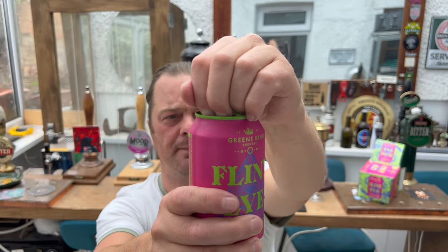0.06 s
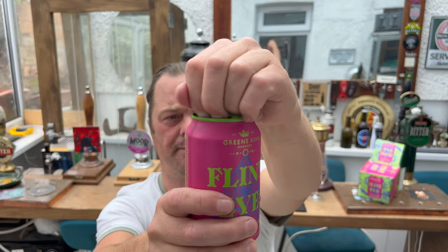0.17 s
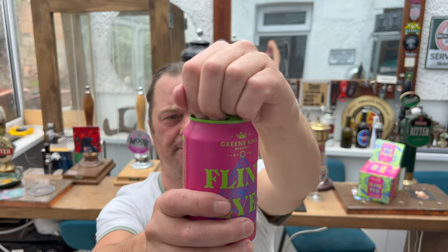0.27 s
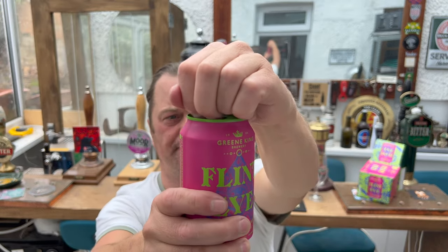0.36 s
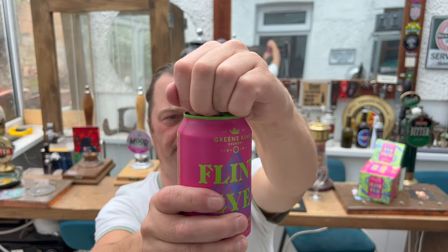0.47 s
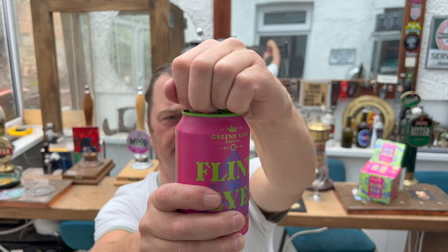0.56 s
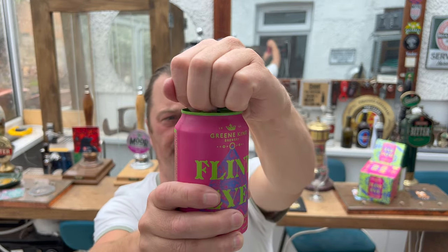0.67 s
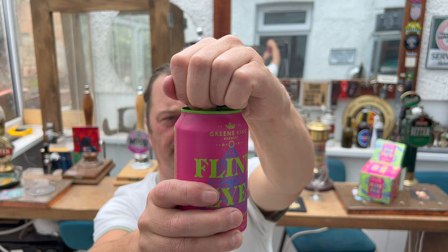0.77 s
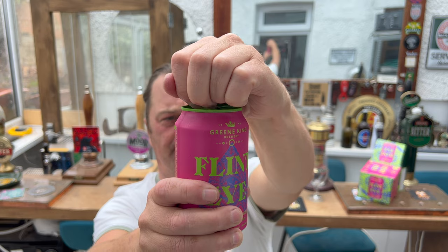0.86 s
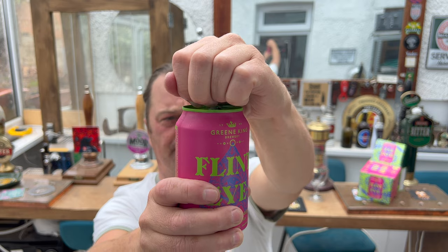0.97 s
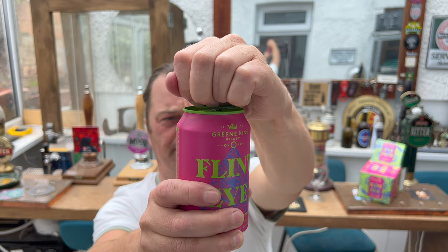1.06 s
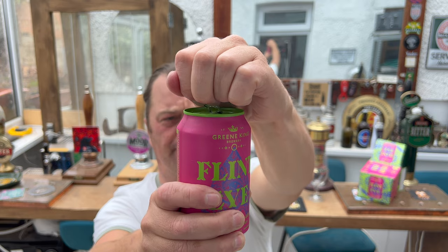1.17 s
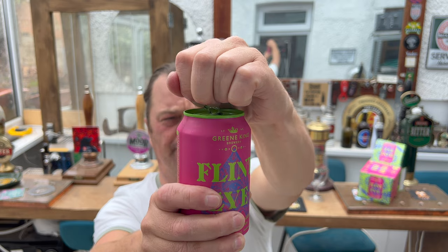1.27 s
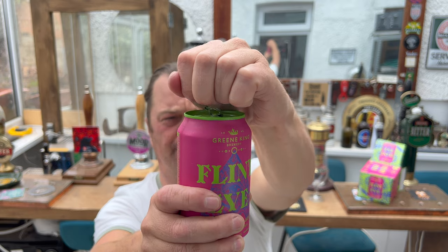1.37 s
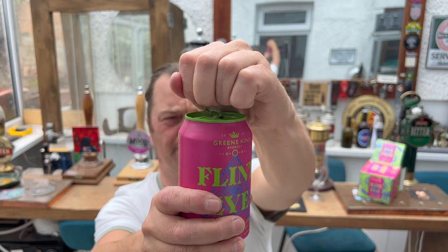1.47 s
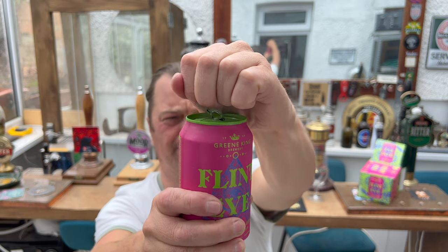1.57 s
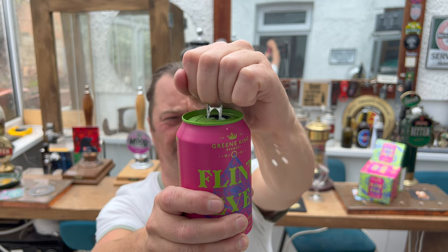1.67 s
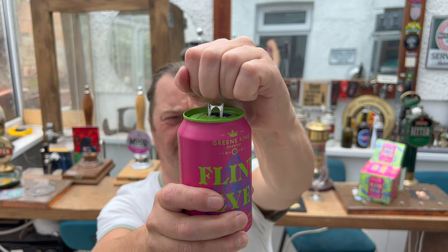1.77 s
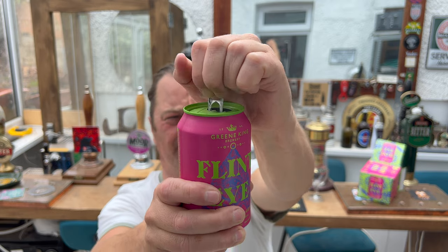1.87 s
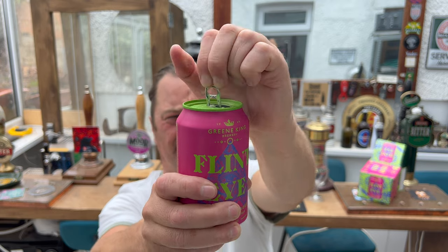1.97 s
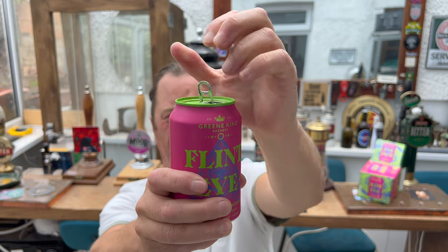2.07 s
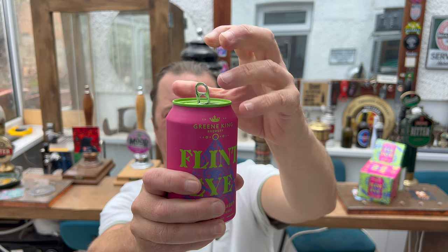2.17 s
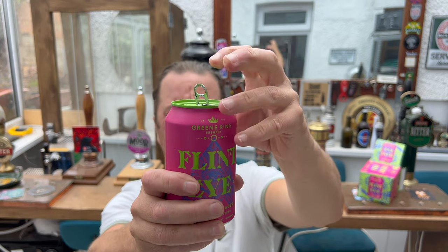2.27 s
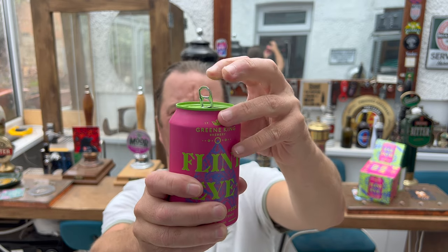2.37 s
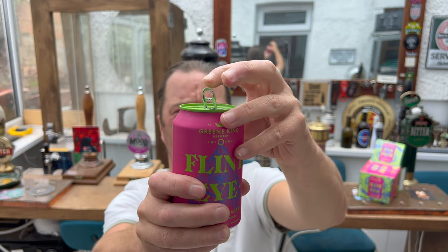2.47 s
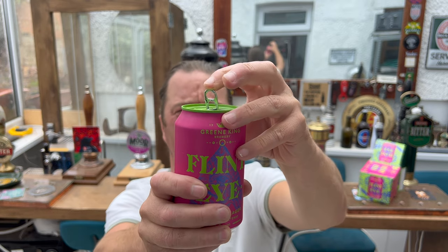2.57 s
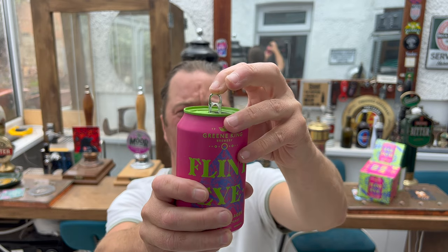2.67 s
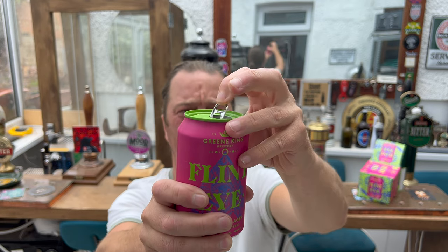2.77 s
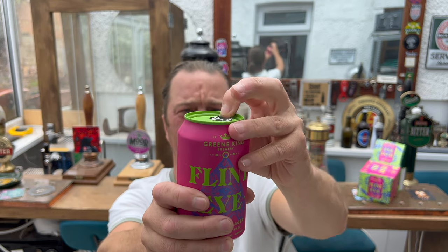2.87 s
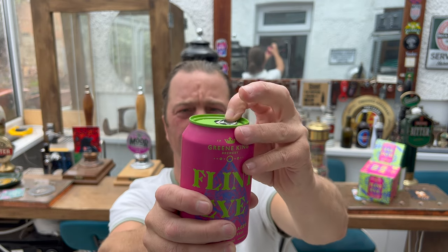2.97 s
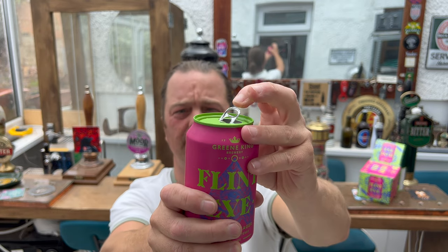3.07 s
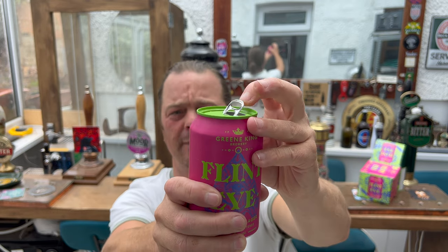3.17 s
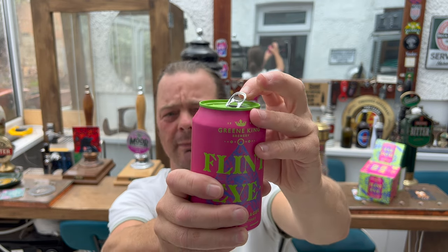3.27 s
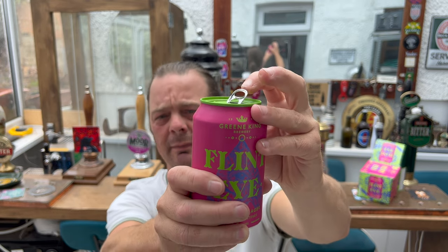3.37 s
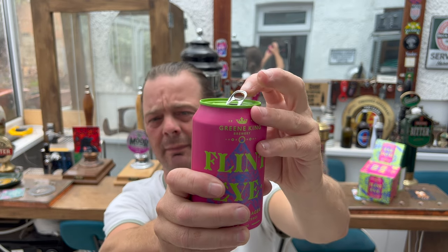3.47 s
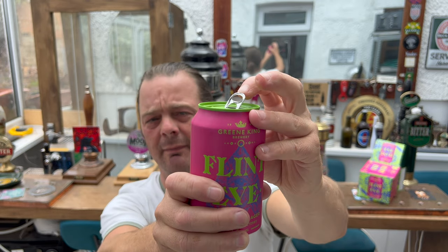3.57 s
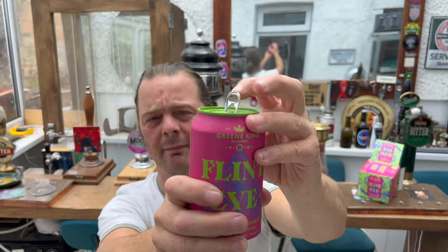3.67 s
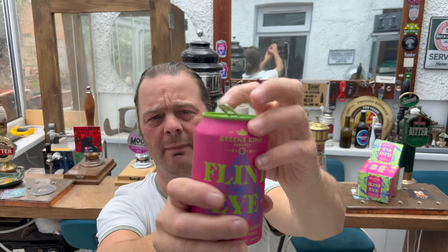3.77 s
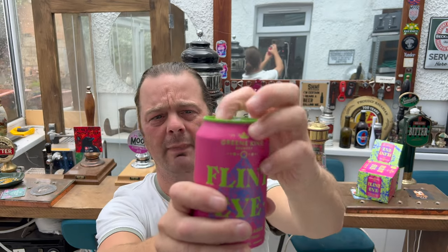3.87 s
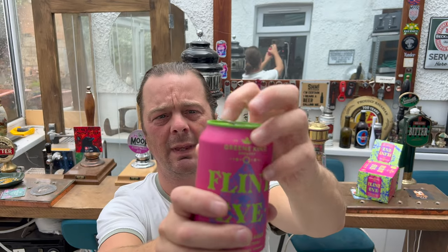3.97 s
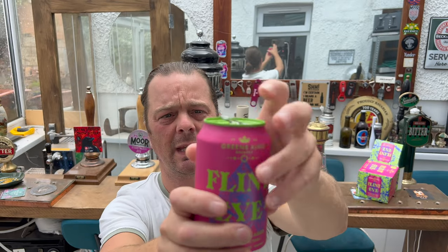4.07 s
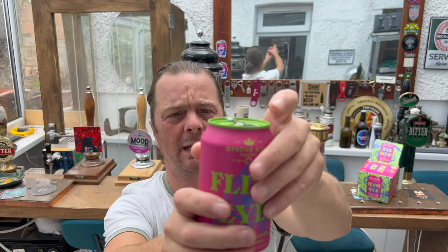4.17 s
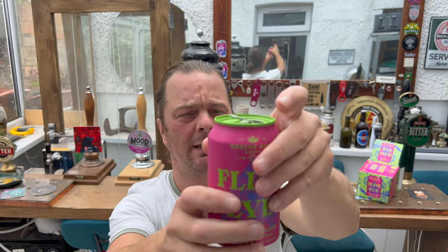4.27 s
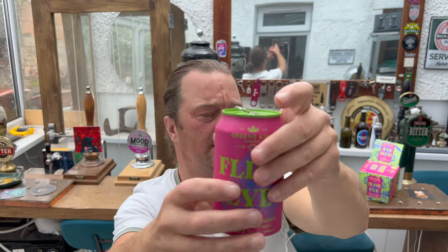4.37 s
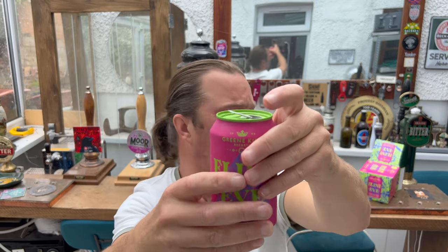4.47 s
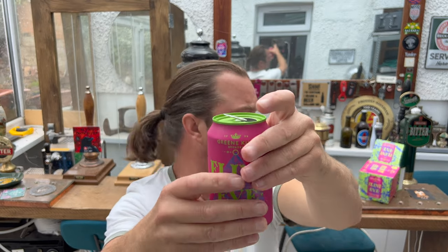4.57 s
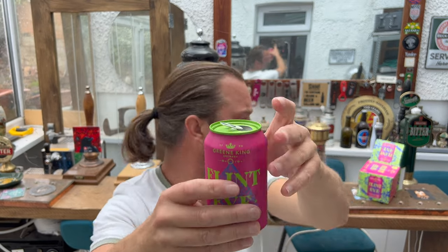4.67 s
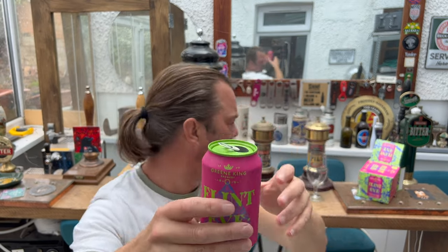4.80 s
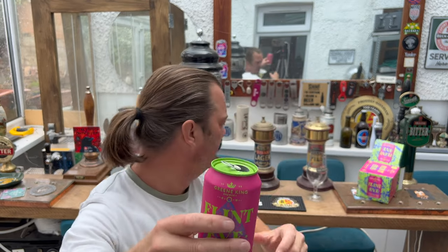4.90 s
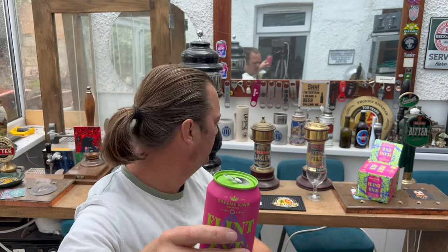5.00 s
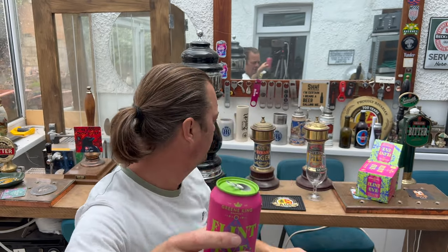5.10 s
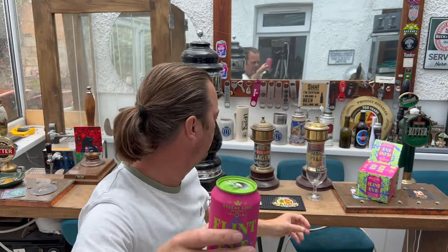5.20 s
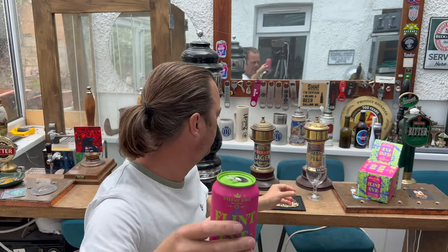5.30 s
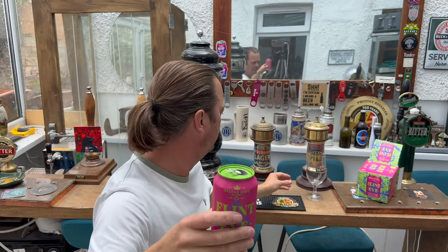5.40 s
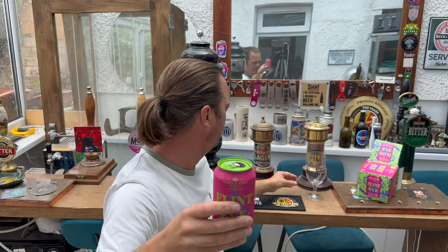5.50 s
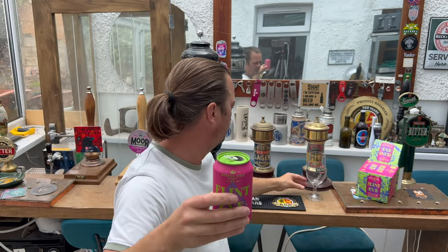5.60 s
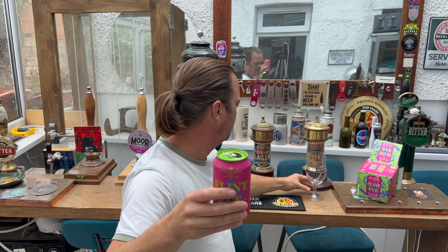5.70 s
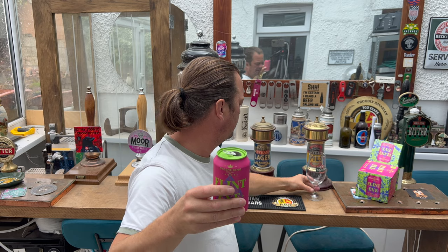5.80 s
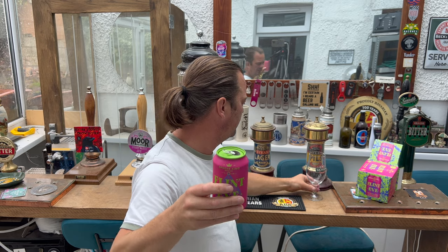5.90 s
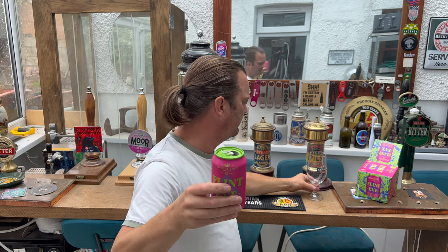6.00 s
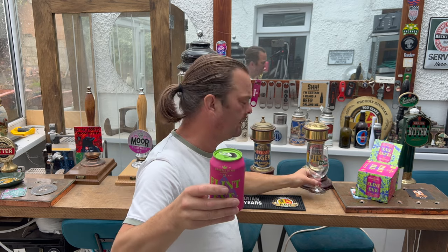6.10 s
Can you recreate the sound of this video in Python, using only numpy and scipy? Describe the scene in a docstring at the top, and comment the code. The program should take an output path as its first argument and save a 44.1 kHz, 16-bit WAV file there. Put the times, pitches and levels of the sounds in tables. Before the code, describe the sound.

Close to the microphone, the tab of a full aluminium can clicks, and a short hiss of gas ends in a loud, ringing pop. Half a second later the lid cracks open with a low thump and a brief fizz. Fingers then tap and scrape lightly at the tab. Faint cloth rustle and two soft thuds follow, over a low cooler hum in a small room.

```python
"""A cooler hums in a small hard-walled bar room; hands and cloth rustle. A full aluminium drinks can is
opened close to a phone. At 0.9 s the tab clicks; gas hisses through a slit, the lid pops, its echo dies
away. At 1.5 s the score line tears, the flap squeals and thumps, the drink fizzes. From 1.9 s fingers
fold the tab back with taps and scrapes; two soft thuds come late. The phone turns its gain down for a
moment after each loud burst."""
import sys
import numpy as np
from scipy import signal
from scipy.fft import rfft, irfft, next_fast_len
from scipy.io import wavfile
from scipy.ndimage import uniform_filter1d, map_coordinates

SR = 44100
rng = np.random.default_rng(int(sys.argv[2]) if len(sys.argv) > 2 else 0)


def generate_wav(signal):
    """Clip the signal to [-1, 1] and save it as 16-bit WAV at the path in sys.argv[1]."""
    frames = np.transpose(np.atleast_2d(signal))
    scaled = np.clip(frames, -1, 1) * 32767
    pcm = np.round(scaled).astype(np.int16)
    wavfile.write(sys.argv[1], SR, pcm)


N = 271038

# cooler and room noise: (time [s], hum [dB], rumble [dB], air [dB])
COOLER_LEVELS = [(0, -57, -65, -59.5), (.85, -58, -65, -60.5), (2.3, -58.5, -68, -60.5),
                 (2.7, -62.5, -77.5, -61), (3.12, -65, -87, -64), (3.19, -61, -74, -63.5),
                 (3.6, -59.5, -73, -63), (4.1, -58.5, -73, -60), (4.3, -57.5, -60, -60),
                 (4.5, -58.5, -71, -59), (4.7, -58.5, -61.5, -59.5), (5.1, -58.5, -65, -60.5),
                 (5.5, -56, -64.5, -59.5), (6.15, -59, -62, -60.5)]
# air noise: (frequency [Hz], density [dB])
AIR_COLOUR = [(60, -29), (90, -15), (134, -11), (162, -15), (185, -9.5), (215, -16.5), (283, -14),
              (340, -19), (390, -13.5), (555, -21), (700, -24), (950, -22), (1200, -29), (1550, -22),
              (2420, -44), (5120, -48), (8500, -47.5), (10000, -79.5), (22000, -120)]
# rumble: (frequency [Hz], density [dB])
RUMBLE_COLOUR = [(15, -31.5), (30, -18.5), (50, -4), (72, 2.5), (95, -21.5), (200, -58.5)]
# skin and cloth strokes: (peak time [s], level [dB], rise [s], hold [s])
RUSTLE_STROKES = [(.188, -72, 0.05, 0), (.478, -75, 0.041, 0), (.66, -78, 0.13, 0),
                  (0.792, -78.5, 0.027, 0.37), (1.933, -62, 0.082, 0.017), (2.202, -83, 0.095, 0.58),
                  (4.17, -71, 0.21, 0.39), (4.574, -71.5, 0.2, 0.35), (4.906, -73, .2, 0.29),
                  (5.334, -60, 0.062, 0.026), (5.628, -77, 0.064, 0.13), (5.89, -75.5, 0.068, 0.0053),
                  (6.107, -77.5, 0.066, 0.11)]
# skin and cloth friction: (frequency [Hz], density [dB])
RUSTLE_COLOUR = [(590, -41), (950, -3), (1150, -8.5), (1500, -2), (2400, -6.5), (3200, -9.5), (4200, -11.5),
                 (6180, -10), (9000, -20.5), (12300, -35), (16000, -41)]
# soft thuds in the room: (time [s], level [dB])
THUDS = [(4.552, -59), (5.389, -49)]
# thudding body: (frequency [Hz], level [dB], t60 [s])
THUD_MODES = [(181, 0, 0.29), (220, -1.5, 0.14)]
# room decay: (frequency [Hz], t60 [s])
ROOM_T60 = [(200, 0.14), (800, 0.25), (2100, 0.29), (5500, 0.22), (9000, .3), (11000, 0.12), (15000, 0.11)]
# wall reflections: (frequency [Hz], level [dB])
WALL_COLOUR = [(250, -24.5), (600, 3.5), (1100, 0.5), (1900, -2.5), (2400, -4), (3100, -0.5), (4400, -3.5),
               (5000, -0.5), (5700, -4.5), (7500, -10.5), (8500, -10.5), (10000, -4.5), (16000, -8)]
# the pop's ringing echo in the room: (frequency [Hz], density [dB])
POP_ECHO_COLOUR = [(600, -56), (1300, -19), (1900, 1), (2400, -16.5), (3100, -25), (3900, -3.5), (4350, -3),
                   (5050, -15), (5700, -2), (6100, -12), (6800, -24), (9500, -28.5), (11000, -42.5),
                   (16000, -55)]

# foam: (frequency [Hz], density [dB])
FOAM_COLOUR = [(300, -49.5), (650, -20), (850, -4), (985, -0.5), (1250, -6), (2000, 1), (2800, -3.5),
               (3840, 3), (5200, -4.5), (6900, -1), (9500, -14), (11500, -24), (16000, -41)]
# nail drags on the lid: (peak time [s], level [dB], rise [s], hold [s])
SCRATCHES = [(3.65, -67.5, 0.102, 0.021), (4.6, -65, .03, 0.045), (4.7, -69, 0.061, 0.024),
             (3.74, -76, .03, 0.029), (2.1, -76, .05, 0.043), (2.5, -83, .05, 0.055),
             (4.8, -74, 0.046, 0.034)]
# skin and nail on metal: (frequency [Hz], density [dB])
SCRAPE_COLOUR = [(700, -22.5), (1400, 2.5), (2100, -3.5), (3000, -10.5), (4300, -11.5), (6200, -6.5),
                 (8500, -12.5), (12000, -42), (16000, -36)]
# touches of the can; knock, lid and tab relative to level:
# (time [s], level [dB], wall pitch [Hz], knock [dB], lid [dB], tab [dB], tick [dB], scrape [dB])
TAPS = [(0.2955, -52.5, 1070, 1, -11, -38, -79, -92), (1.944, -42, 1367, -36, -14, -28, -47.5, -74),
        (1.959, -53.5, 1414, -1.5, -7, -21, -52, -77), (2.678, -47.5, 1430, -14, -30, -33.5, -54, -66.5),
        (2.698, -49.5, 1170, -14.5, -31, -12.5, -54, -71), (2.709, -43.5, 1145, -28, -35, -35, -45, -83),
        (2.793, -61, 1050, 5, -26, -32, -63, -89), (2.833, -53.5, 1496, -17, -32, -35, -50, -70.5),
        (3.032, -42.5, 1131, -13, -16, -6.5, -71.5, -68.5), (3.196, -46.5, 1370, -16, -15, -9, -74, -66.5),
        (3.315, -52, 1114, -19.5, -17, -33, -72, -69.5), (3.442, -42, 1100, -16, -22, -15, -74, -69.5),
        (3.791, -47, 1120, -18, -11, -13.5, -57, -67.5), (3.9088, -40, 1403, -15, -1, -7.5, -40, -59.5),
        (4.184, -50, 1410, -29.5, -20, -16, -53.5, -73.5), (4.23, -56.5, 1386, -19, -14, -1, -56, -83),
        (4.326, -52.5, 1330, -12, -11, -2, -51.5, -63), (4.345, -46, 1400, -21, -10.5, -3, -52, -64.5),
        (4.409, -51, 1460, -11.5, -12, -2, -68, -67.5)]
# whole filled can: (frequency [Hz], level [dB], t60 [s])
CAN_MODES = [(801, -0.5, 0.067), (905, 1, 0.055)]
# pull tab: (frequency [Hz], level [dB], t60 [s])
TAB_MODES = [(2620, -2, 0.011), (2790, 1, 0.014), (3700, -12, 0.014), (4740, -8, 0.014)]
# lid: (frequency [Hz], level [dB], undamped t60 [s])
LID_MODES = [(1850, -6, 0.07), (1950, 1, 0.09), (2040, 0, 0.09), (2150, -12, 0.03), (2470, -22, 0.006),
             (4140, -6, 0.02)]
# nail tick: (frequency [Hz], density [dB])
TICK_COLOUR = [(800, -9), (1500, -17), (2600, -15), (4000, -12), (5500, -1), (7000, 8), (9000, 0),
               (12000, -15), (17000, -21)]

# low swells after the thump: (start [s], length [s], level [dB], frequency [Hz])
AFTER_SWING = [(1.5278, 0.24, -33, 51), (1.761, 0.197, -33.5, 47.5), (1.97, 0.22, -51.5, 47.3)]
# score line tearing: (time [s], level [dB])
TEAR_LEVELS = [(1.524, -91), (1.528, -37.5), (1.532, -27), (1.538, -24.5), (1.556, -23), (1.561, -16),
               (1.565, -13), (1.569, -21), (1.572, -63)]
# tearing noise: (frequency [Hz], density [dB])
TEAR_COLOUR = [(300, -17), (700, -11), (1100, -7.5), (1500, -9.5), (2000, 2), (2400, -4.5), (2800, -8),
               (4000, -3), (5200, -9.5), (6200, -3), (8200, -5.5), (9500, -12), (12000, -22.5),
               (16000, -17)]
# bending flap: (time [s], level [dB], pitch [Hz])
FLAP_SQUEAL = [(1.535, -79, 4314), (1.538, -20.5, 4600), (1.543, -22.5, 5037), (1.553, -17, 5193),
               (1.556, -33, 5450), (1.561, -24, 5600), (1.564, -80.5, 5566)]
# gas through the widening slit: (time [s], level [dB], lid share [dB], roar share [dB])
JET_LEVELS = [(1.008, -57, -10, -20), (1.016, -50.5, -12.5, -20), (1.02, -29.5, -14.5, -20.5),
              (1.035, -21, -11, -12), (1.05, -21, -18, -11.5), (1.066, -18.5, -8, -6),
              (1.075, -20, 0.5, -2.5), (1.088, -21.5, -4, -3), (1.097, -19, -2, 6.5), (1.101, -57, -17, 2)]
# narrow-slit hiss: (frequency [Hz], density [dB])
JET_COLOUR = [(950, -30), (1500, -15), (2020, -9.5), (3600, -17.5), (5500, -5.5), (7300, 8), (8500, 5.5),
              (10200, -4), (12300, 2.5), (13300, -11.5), (15200, 3.5), (16000, -1)]
# wide-slit roar: (frequency [Hz], density [dB])
ROAR_COLOUR = [(180, -35), (320, -13.5), (900, -11.5), (1400, 2), (1700, -5), (2600, -11.5), (3400, -20),
               (4300, -5), (6200, 1), (8000, -9), (16000, -31)]
# lid snaps: (time [s], ring [dB], crack [dB], top crack [dB])
SNAPS = [(0.8978, -28.5, -12.5, -19), (1.0086, -37.5, -28.5, -34.5), (1.018, -41, -32, -24),
         (1.0686, -3.5, -11.5, -30.5), (1.0914, -5.5, -19.5, -40), (1.0957, -5, -7, -20),
         (1.5249, -36.5, -36, -34.5), (1.5325, -17.5, -26.5, -11), (1.535, -15, -7.5, -11),
         (1.557, -42, -23, -15.5), (1.5624, -44.5, -12.5, -16.5), (1.5637, -15, -8, -10)]
# metal crack: (frequency [Hz], density [dB])
CRACK_COLOUR = [(1500, -35.5), (2500, -10.5), (3300, -14), (3900, -14), (4350, -0.5), (4800, -4),
                (5250, 0.5), (5800, -9.5), (6500, -5.5), (7200, -1.5), (9000, -4), (10500, -21.5),
                (17000, -25.5)]
# top of the crack: (frequency [Hz], density [dB])
TOP_CRACK_COLOUR = [(6000, -31), (8200, -2.5), (10000, -7), (11800, 2.5), (13600, -17.5), (15200, -4),
                    (17000, -12)]

# diffuse sound at the two microphone ports: (frequency [Hz], coherence [ratio])
COHERENCE = [(60, 0.36), (130, 0.98), (290, 0.52), (640, 0.027), (1400, 0.31), (3100, 0.064),
             (15000, 0.0046)]
# diffuse balance: (frequency [Hz], left over right [dB])
AROUND_BALANCE = [(60, 1.5), (380, 5), (1300, 4), (2400, 4), (4400, 10.5), (8100, 13.5), (12000, -11)]
# direct balance: (frequency [Hz], left over right [dB])
CAN_BALANCE = [(60, 3.5), (500, 4.5), (1200, 1), (2000, 3.5), (4400, 5), (8100, 1), (12000, 0)]
# direct phase: (frequency [Hz], left lead [rad])
CAN_LEAD = [(0, -0.5), (1700, 0.68), (2700, 1.5), (4300, 2), (5600, 1), (8000, 2.5), (12000, 1.27),
            (16000, 1)]
# close noise that differs between ports: (frequency [Hz], share [dB])
NEAR_SPREAD = [(500, -8), (4500, -4), (9000, -7), (14000, -15.5)]

SIDES = np.array([[.5], [-.5]])  # left, right


def amp(db):
    """Decibels to gain."""
    return 10 ** (np.asarray(db) / 20)


def unit(x):
    """x at rms 1."""
    return x / np.sqrt(np.mean(x ** 2) + 1e-20)


def along(points, hz):
    """(frequency, value) points read on a log axis."""
    point_hz, values = np.transpose(points)
    return np.interp(np.log(hz + 1), np.log(point_hz + 1), values)


def curves(rows):
    """Per-sample curve of each column after the time."""
    times_s, *columns = np.transpose(rows)
    return [np.interp(np.arange(N) / SR, times_s, column) for column in columns]


def envelope(rows):
    """Gain of a (time, level) curve, silent outside its span."""
    times_s, db = np.transpose(rows)[:2]
    return amp(np.interp(np.arange(N) / SR, times_s, db, left=-300, right=-300))


def swell(peak_s, db, rise_s, hold_s, fall_db_per_s):
    """Gain that climbs 20 dB per rise time, holds, then falls."""
    t = np.arange(N, dtype=np.float32) / SR - peak_s
    rise_db = 20 * np.minimum(t, 0) / rise_s
    return amp(db + rise_db - fall_db_per_s * np.clip(t - hold_s, 0, None))


def wobble(rate_hz):
    """Smooth random curve with knots at rate_hz."""
    knots = rng.standard_normal(int(N * rate_hz / SR) + 4)
    return map_coordinates(knots, [np.arange(N) * rate_hz / SR])


def filtered(x, response):
    """x through a complex frequency response."""
    size = next_fast_len(N + SR // 2)
    return irfft(rfft(x, size) * response(np.fft.rfftfreq(size, 1 / SR)), size)[..., :N]


def diffuse_noise(colour):
    """Noise from all around: partly alike in the bass, unrelated in the treble."""
    def mid_side(hz):
        angle = np.arccos(np.clip(along(COHERENCE, hz), -1, 1)) / 2
        return amp(along(colour, hz)) * [np.cos(angle), np.sin(angle)]
    mid, side = filtered(rng.standard_normal((2, N)), mid_side)
    return unit(np.array([mid + side, mid - side]))


def near_noise(colour):
    """Noise from the can, not quite alike at both ports."""
    mid, side = unit(filtered(rng.standard_normal((2, N)), lambda hz: amp(along(colour, hz))))
    return mid + filtered(side, lambda hz: amp(along(NEAR_SPREAD, hz))) * 2 * SIDES


def patchy(x, depth_db):
    """x with random louder and softer time-frequency patches, rms 1."""
    spectra = signal.stft(x, nperseg=512)[2]
    field = rng.standard_normal(spectra.shape[1:])
    field = uniform_filter1d(uniform_filter1d(field, size=9, axis=0), size=9, axis=1)
    return unit(signal.istft(spectra * amp(depth_db * unit(field)), nperseg=512)[1][:, :N])


def burst(colour, t, t60_s):
    """Decaying puff of coloured noise."""
    gain = amp(along(colour, np.fft.rfftfreq(len(t), 1 / SR)))
    noise = irfft(rfft(rng.standard_normal(len(t))) * gain, len(t))
    return unit(noise) * amp(-60 * t / t60_s)


def ring(modes, t, scatter_db):
    """One blow on a set of modes, strengths scattered."""
    return sum(amp(db + scatter_db * rng.standard_normal() - 60 * t / t60_s) * np.sin(2 * np.pi * hz * t)
               for hz, db, t60_s in modes)


def finger_damping(t, free_s=.0038, residue=.13):
    """Gain of metal that rings freely until a finger damps it."""
    return residue + (1 - residue) * np.exp(-(t / free_s) ** 6)


def cooler(hum_hz=105.9):
    """Wavering hum over air noise and rumble."""
    hum_db, rumble_db, air_db = curves(COOLER_LEVELS)
    hum_gain = np.sqrt(2) * amp(hum_db + wobble(8.6))
    hum = hum_gain * np.sin(2 * np.pi * np.cumsum(hum_hz + .61 * wobble(6)) / SR)
    air = amp(air_db) * patchy(diffuse_noise(AIR_COLOUR), depth_db=1.5)
    rumble = amp(rumble_db + 2.2 * wobble(12)) * diffuse_noise(RUMBLE_COLOUR)
    return hum + air + rumble


def rustle():
    """Skin and cloth rub in uneven swells."""
    power = sum(swell(*stroke, fall_db_per_s=140) ** 2 for stroke in RUSTLE_STROKES)
    friction = patchy(diffuse_noise(RUSTLE_COLOUR), depth_db=2.5)
    return np.sqrt(power) * friction * amp(1.4 * wobble(120))


def thuds(attack_s=.004):
    """A padded contact rings a low body."""
    out, t = np.zeros(N + SR), np.arange(SR // 5) / SR
    attack = 1 - np.exp(-t / attack_s)
    for start_s, db in THUDS:
        out[round(start_s * SR):][:len(t)] += amp(db) * ring(THUD_MODES, t, scatter_db=1.5) * attack
    return out[:N]


def room(x, gap_s=.011, rise_s=.004):
    """Walls reflect after a gap; decay depends on frequency."""
    hz, t, spectra = signal.stft(rng.standard_normal((2, SR)), SR, nperseg=256)
    tail_db = along(WALL_COLOUR, hz)[:, None] - 60 * t / along(ROOM_T60, hz)[:, None]
    tail = signal.istft(spectra * amp(tail_db), SR, nperseg=256)[1]
    onset = np.clip((np.arange(tail.shape[1]) / SR - gap_s) / rise_s, 0, 1)
    return signal.fftconvolve(x[None], tail * onset / np.linalg.norm(tail[0]), axes=1)[:, :N]


def pop_echo():
    """The pop's ringing echo dies away in the room."""
    gain = swell(peak_s=1.108, db=-24, rise_s=.008, hold_s=0, fall_db_per_s=121.5)
    return gain * diffuse_noise(POP_ECHO_COLOUR)


def fizz():
    """The drink foams up once the can is open."""
    gain = swell(peak_s=1.579, db=-24.5, rise_s=.008, hold_s=0, fall_db_per_s=113.6)
    return gain * amp(.52 * wobble(310)) * diffuse_noise(FOAM_COLOUR)


def scrape(rise_s=.006, hold_s=.025):
    """Skin and nail drag in grains, alone and after each tap."""
    strokes = SCRATCHES + [(start_s, scrape_db, rise_s, hold_s) for start_s, *_, scrape_db in TAPS]
    power = sum(swell(*stroke, fall_db_per_s=174) ** 2 for stroke in strokes)
    return np.sqrt(power) * amp(2.1 * wobble(250)) * near_noise(SCRAPE_COLOUR)


def taps(attack_s=.0007, grip_spread=.025):
    """Each touch rings wall, lid, can and tab; the nail ticks. Grip detunes the tab."""
    out, t = np.zeros(N + SR), np.arange(SR // 10) / SR
    attack = 1 - np.exp(-t / attack_s)
    for start_s, db, wall_hz, knock_db, lid_db, tab_db, tick_db, _ in TAPS:
        wall_modes = [(.9 * wall_hz, -9, .03), (wall_hz, -5, .03), (1.15 * wall_hz, -10, .02)]
        wall = ring(wall_modes, t, scatter_db=2)
        lid = amp(lid_db) * ring(LID_MODES, t, scatter_db=2) * np.sqrt(finger_damping(t))
        knock = amp(knock_db) * ring(CAN_MODES, t, scatter_db=2)
        detune = 1 + grip_spread * rng.standard_normal()
        tab = amp(tab_db) * ring(TAB_MODES, t * detune, scatter_db=3)
        tick = amp(tick_db) * burst(TICK_COLOUR, t, t60_s=.025)
        out[round(start_s * SR):][:len(t)] += attack * (amp(db) * (wall + lid + knock + tab) + tick)
    return out[:N]


def thump(start_s=1.567, final_hz=58):
    """The flap gives way: cavity note drops as the can vents, one suction dip, low after-swing."""
    clock_s = np.arange(N) / SR
    t = clock_s - start_s
    vent_s = np.clip(t, -.004, None)
    cycles = final_hz * vent_s + 1.8 * (1 - np.exp(-vent_s / .0045)) - .3 * np.exp(-vent_s / .002)
    fade = np.exp(-np.abs(vent_s / .036) ** 5) * np.clip((t + .004) / .002, 0, 1)
    note = amp(-17.5) * np.cos(2 * np.pi * cycles) * fade
    suction = amp(-6) * np.exp(-((t - .014) / .0026) ** 2)
    swing = np.zeros(N)
    for onset_s, length_s, db, hz in AFTER_SWING:
        age_s = clock_s - onset_s
        arch = np.sin(np.pi * np.clip(age_s / length_s, 0, 1))
        swing += amp(db) * arch * np.cos(2 * np.pi * hz * age_s)
    return note - suction + swing * np.clip(t / .02, 0, 1)


def tear():
    """Metal parts in tiny uneven steps, gas rushes through, the bending flap squeals upward."""
    pitch_hz = curves(FLAP_SQUEAL)[1] + 90 * wobble(500)
    squeal = amp(3.5 * wobble(330)) * np.sin(2 * np.pi * np.cumsum(pitch_hz) / SR)
    rip = amp(1.9 * wobble(360)) * near_noise(TEAR_COLOUR)
    return envelope(TEAR_LEVELS) * rip + envelope(FLAP_SQUEAL) * squeal


def jet(mode_width_hz=150):
    """Gas seeps, leaks, then rushes through the slit; its fluttering turbulence shakes the lid."""
    def lid_response(hz):
        loss = 1j * hz * mode_width_hz
        return sum(amp(db) * loss / (mode_hz ** 2 - hz ** 2 + loss) for mode_hz, db, _ in LID_MODES)
    lid = unit(filtered(rng.standard_normal(N), lid_response))
    hiss = near_noise(JET_COLOUR)
    roar = near_noise(ROAR_COLOUR)
    _, lid_db, roar_db = curves(JET_LEVELS)
    seep = swell(peak_s=.897, db=-50.5, rise_s=.01, hold_s=0, fall_db_per_s=710) * hiss
    leak = swell(peak_s=.9, db=-40, rise_s=.001, hold_s=0, fall_db_per_s=710) * (hiss + amp(-5.5) * lid)
    rush = envelope(JET_LEVELS) * (hiss + amp(lid_db) * lid + amp(roar_db) * roar)
    return amp(1.3 * wobble(150)) * (seep + leak + rush)


def snaps(attack_s=.0003, crack_rise_s=.00077, corner_hz=900):
    """The metal cracks and the lid rings until the finger damps it. A small lid radiates little bass."""
    out, t = np.zeros(N + SR), np.arange(SR // 10) / SR
    attack = 1 - np.exp(-t / attack_s)
    crack_gain = (1 - np.exp(-t / crack_rise_s)) * np.sqrt(finger_damping(t / 2))
    for start_s, lid_db, crack_db, top_db in SNAPS:
        lid = amp(lid_db) * finger_damping(t) * ring(LID_MODES, t, scatter_db=1)
        crack = amp(crack_db) * crack_gain * burst(CRACK_COLOUR, t, t60_s=.032)
        top = amp(top_db) * burst(TOP_CRACK_COLOUR, t, t60_s=.014)
        out[round(start_s * SR):][:len(t)] += attack * (lid + crack + top)
    return filtered(out[:N], lambda hz: (1j * hz / (corner_hz + 1j * hz)) ** 3)


def scene():
    """Can and room; the phone's body shades and delays the can differently at its two ports."""
    thump_balance_db, thump_lead_s = 3.5, .0004
    can = snaps() + taps() + jet() + tear() + scrape()
    direct = filtered(can, lambda hz: amp(along(CAN_BALANCE, hz) * SIDES)
                      * np.exp(1j * along(CAN_LEAD, hz) * SIDES))
    low = filtered(thump(), lambda hz: amp(thump_balance_db * SIDES)
                   * np.exp(2j * np.pi * hz * thump_lead_s * SIDES))
    around = amp(-8) * room(can.mean(0)) + pop_echo() + fizz() + cooler() + rustle() + thuds()
    return direct + low + filtered(around, lambda hz: amp(along(AROUND_BALANCE, hz) * SIDES))


def record(dry):
    """Gain control with fast drop and steady recovery, soft saturation, band limit."""
    threshold_db, cut_db_per_db, recovery_db_per_s = -24, .42, 30
    ceiling, top_hz = .88, 15950
    power = uniform_filter1d(np.mean(dry ** 2, 0), size=441)  # 10 ms
    level_db = 10 * np.log10(np.abs(power) + 1e-12)
    target_cut_db = cut_db_per_db * np.clip(level_db - threshold_db, 0, None)
    ramp_db = recovery_db_per_s * np.arange(N) / SR
    cut_db = np.maximum.accumulate(target_cut_db + ramp_db) - ramp_db
    levelled = dry * amp(-uniform_filter1d(cut_db, size=221))  # 5 ms
    saturated = levelled / (1 + np.abs(levelled / ceiling) ** 4) ** .25
    return filtered(saturated, lambda hz: np.clip((top_hz - hz) / 100, 0, 1))


dry = scene()
out = record(dry)
generate_wav(out)
```